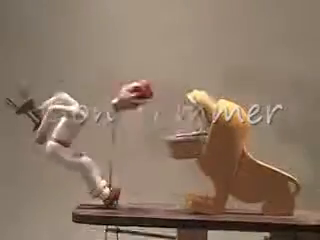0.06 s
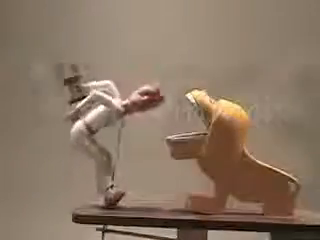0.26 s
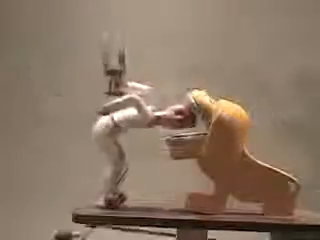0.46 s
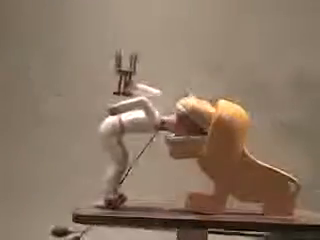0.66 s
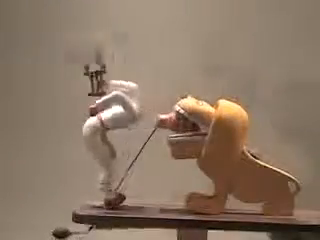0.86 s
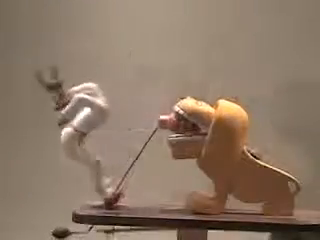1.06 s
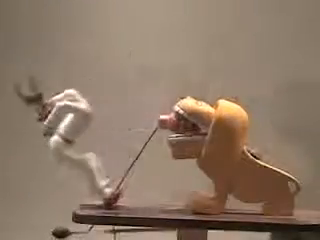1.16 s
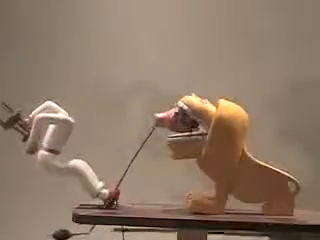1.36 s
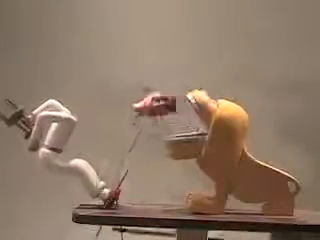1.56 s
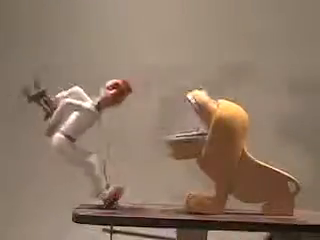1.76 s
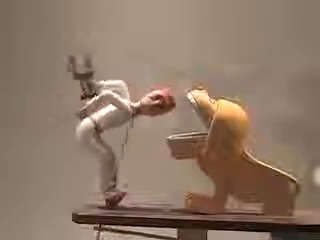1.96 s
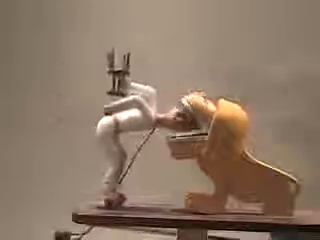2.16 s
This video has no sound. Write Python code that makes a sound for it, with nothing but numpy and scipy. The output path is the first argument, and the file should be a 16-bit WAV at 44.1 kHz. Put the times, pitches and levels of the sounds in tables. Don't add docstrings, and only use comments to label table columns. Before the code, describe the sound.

Hard wooden clacks from a mechanical toy in a small bare room, above a low motor drone.

```python
import sys
import numpy as np
from scipy import signal
from scipy.fft import rfft, irfft, next_fast_len
from scipy.io import wavfile
from scipy.ndimage import uniform_filter1d, map_coordinates

SR = 44100
rng = np.random.default_rng(int(sys.argv[2]) if len(sys.argv) > 2 else 0)


def ratio_of_db(decibels):
    return 10 ** (np.asarray(decibels, float) / 20)


def unload_audio(sound):
    columns = np.transpose(np.atleast_2d(sound))
    steps = np.round(np.clip(columns, -1, 1) * 32767)
    wavfile.write(sys.argv[1], SR, steps.astype(np.int16))


N = 97020


def unit(x):
    return x / np.sqrt(np.mean(x ** 2) + 1e-20)


def along(points, hz):
    f, v = np.transpose(points)
    return np.interp(np.log(hz + 1), np.log(f + 1), v)


def wobble(rate):
    knots = rng.standard_normal(int(N * rate / SR) + 4)
    return map_coordinates(knots, [np.arange(N) * rate / SR])


def filtered(x, response):
    m = next_fast_len(x.shape[-1] + SR // 2)
    return irfft(rfft(x, m) * response(np.fft.rfftfreq(m, 1 / SR)), m)[..., :x.shape[-1]]


CRACK, CRACK_T60_S, ATTACK_S = 0.2, 0.0081, 0.0001
BLOOM = 0.038
SCATTER_DB, GRAIN_RAD = 1.5, 0.07


def ring(modes, crack, attack_s=ATTACK_S):
    t = np.arange(SR // 3) / SR
    x = np.zeros(len(t))
    for k, (hz, db, t60) in enumerate(modes):
        decay = ratio_of_db(db + rng.normal(0, SCATTER_DB) - 60 * t / t60)
        bloom = 1 - np.exp(-t / (BLOOM * t60))
        grain = GRAIN_RAD * hz / 3000 * np.cumsum(rng.standard_normal(len(t)))
        x += (-1) ** k * decay * bloom * np.sin(2 * np.pi * hz * t + grain)
    x += crack * ratio_of_db(-60 * t / CRACK_T60_S) * rng.standard_normal(len(t))
    x *= 1 - np.exp(-t / attack_s)
    return x / np.abs(x).max()


NECK_WET_DB, JAW_WET_DB, LEVER_WET_DB, TICK_WET_DB = -4, -12, -12.5, -11
ROOM_DELAY_S, ROOM_RISE_S, ROOM_FEED_T60_S = 0.0087, 0.0059, 0.008
# frequency in Hz, t60 in seconds.
ROOM_DECAY = [(300, 0.83), (800, 0.32), (2100, 0.46), (5500, 0.45), (9000, 0.22)]
# frequency in Hz, level in dB.
ROOM_COLOUR = [(60, -29), (300, -1.5), (1000, 7), (2400, 6), (3300, -4), (4500, -1.5), (6500, -6),
               (9000, -5.5)]
# delay in seconds, level in dB.
WALLS = [(.0045, -10.5), (.0105, -6), (.021, -12.5), (.031, -11.5)]


def in_room(blow, wet_db):
    hz, t, z = signal.stft(rng.standard_normal((2, SR * 3 // 5)), SR, nperseg=256)
    tail_db = along(ROOM_COLOUR, hz)[:, None] - 60 * t / along(ROOM_DECAY, hz)[:, None]
    tail = signal.istft(z * ratio_of_db(tail_db), SR, nperseg=256)[1]
    since_arrival = np.maximum(np.arange(tail.shape[1]) / SR - ROOM_DELAY_S, 0)
    tail = tail * (1 - np.exp(-since_arrival / ROOM_RISE_S))
    feed = blow * ratio_of_db(-60 * np.arange(len(blow)) / SR / ROOM_FEED_T60_S)
    feed = feed * np.linalg.norm(blow) / np.linalg.norm(feed)
    wet = signal.fftconvolve(feed[None], ratio_of_db(wet_db) * tail / np.linalg.norm(tail[0]), axes=1)
    dry = np.pad(blow, (0, wet.shape[1] - len(blow)))
    walls = sum(ratio_of_db(db + wet_db - NECK_WET_DB) * np.roll(dry, round(s * SR)) for s, db in WALLS)
    return wet + (dry + walls) * [[1], [.5]]


REBOUND_S, REBOUND_DB = 0.0026, -3
# start in seconds, peak in dB.
CLACKS = [
    (0.2121, -5.5),
    (1.8425, -5.5),
]
# frequency in Hz, level in dB, t60 in seconds.
NECK = [(1040, -24.5, 0.037), (1615, -22, 0.014), (1870, -10.5, 0.027), (2255, -16, 0.011),
        (2477, -6, 0.022), (2775, -10.5, 0.015), (3265, -3.5, 0.011), (3696, -1.5, 0.0083),
        (3694, 0, 0.0088), (4422, -9.5, 0.019), (5020, -6.5, 0.0068), (5800, -14, 0.0057),
        (6600, -9, 0.0078), (8800, -39, 0.016)]


def head_clacks():
    blows = []
    for s, db in CLACKS:
        for k in range(2):
            sound = in_room(ring(NECK, CRACK), NECK_WET_DB)
            blows.append((s + k * REBOUND_S, db + k * REBOUND_DB, sound))
    return blows


# frequency in Hz, level in dB, t60 in seconds.
STAND = [(84, -37, 0.39), (103, -37.5, .2), (145.3, -32, 0.29), (383, -41.5, 0.077)]


def stand_thumps():
    loudest_db = max(db for hz, db, t60 in STAND)
    return [(s, db + loudest_db, ring(STAND, 0, attack_s=0.023) * [[1], [0]]) for s, db in CLACKS]


# start in seconds, peak in dB.
BITES = [
    (0.816, -19),
]
# frequency in Hz, level in dB, t60 in seconds.
JAW = [(1606, 1, 0.018), (1962, 1, .035), (2600, -2, .02), (3250, -0.5, 0.016), (3670, 6, 0.019),
       (4040, -6, 0.056), (4450, -2.5, 0.016), (4910, -2.5, 0.02), (6300, -17, .015), (8180, -28, .015)]


def jaw_bites():
    return [(s, db, in_room(ring(JAW, CRACK), JAW_WET_DB)) for s, db in BITES]


# start in seconds, peak in dB.
RELEASES = [
    (0.004, -28),
    (0.023, -26.5),
    (1.5543, -17),
    (1.5567, -16),
    (1.560, -16.5),
    (1.5629, -18.5),
    (1.651, -25.5),
    (1.658, -34.5),
]
# frequency in Hz, level in dB, t60 in seconds.
LEVER = [(540, -12, .02), (835, -10.5, 0.011), (1408, -2, 0.039), (1763, -1.5, 0.023), (2070, -5, .025),
         (2874, -6.5, 0.024), (3336, -3, 0.0099), (3897, -6.5, 0.017), (4990, -13, 0.0064),
         (6130, -12.5, .012), (6950, -12, 0.0095), (8480, -28, .008)]
DULL_DB_PER_OCTAVE = 0.5


def lever_blow(db):
    softer_db = max(level for s, level in RELEASES) - db
    modes = []
    for hz, level, t60 in LEVER:
        octaves_up = max(np.log2(hz / 1800), 0)
        modes.append((hz, level - DULL_DB_PER_OCTAVE * softer_db * octaves_up, t60))
    return ring(modes, CRACK * ratio_of_db(-2 * softer_db))


def lever_releases():
    return [(s, db, in_room(lever_blow(db), LEVER_WET_DB)) for s, db in RELEASES]


TICK_SPREAD = 0.05
# start in seconds, peak in dB, pitch in Hz, t60 in seconds.
TICKS = [
    (.5974, -39, 5140, 0.023),
    (.598, -43, 3320, 0.012),
    (0.9533, -36, 4950, 0.0185),
    (0.9544, -57, 7500, 0.012),
    (.960, -39, 2930, 0.032),
    (.687, -58, 7800, 0.021),
    (2.0306, -50, 7580, 0.018),
    (2.085, -55, 8660, 0.032),
]


def wire_ticks():
    blows = []
    for s, db, hz, t60 in TICKS:
        modes = [(hz, 0, t60), (hz + TICK_SPREAD * hz, -5, t60), (hz - TICK_SPREAD * hz, -5, t60)]
        blows.append((s, db, in_room(ring(modes, 0.1), TICK_WET_DB)))
    return blows


def toy():
    out = np.zeros((2, N + 2 * SR))
    for s, db, sound in head_clacks() + stand_thumps() + jaw_bites() + lever_releases() + wire_ticks():
        out[:, round(s * SR):][:, :sound.shape[1]] += ratio_of_db(db) * sound
    return out[:, :N]


# frequency in Hz, rms in dB, unsteadiness in dB, phase wander in radians.
HUM = [(54.6, -61, 2, .8), (59.1, -63, 2.5, .8), (109.1, -62, 1.5, .4), (120.03, -49, .3, .05),
       (138.2, -53, 1.5, .3), (209, -62, 1.5, .6), (218.2, -59, 1.5, .5), (240.06, -61, .5, .1),
       (360, -62, .5, .1), (472.2, -64, 1.5, .5), (1146, -61, 1, .8)]
HUM_DB = -0.2


def motor_hum():
    t = np.arange(N) / SR
    x = np.zeros(N)
    for hz, db, sway_db, wander in HUM:
        level = np.sqrt(2) * ratio_of_db(db + sway_db * wobble(5.5))
        x += level * np.sin(2 * np.pi * (hz * t + rng.random()) + wander * wobble(4.24))
    return ratio_of_db(HUM_DB) * x * np.array([[1], [0]])


AIR_PATCHY_DB = 1.5


def rush(spectrum):
    z = signal.stft(rng.standard_normal((2, N)), nperseg=512)[2]
    field = uniform_filter1d(rng.standard_normal(z.shape[1:]), 6, 0)
    field = uniform_filter1d(field, 10, 1)
    pair = signal.istft(z * ratio_of_db(AIR_PATCHY_DB * unit(field)), nperseg=512)[1][:, :N]
    return unit(filtered(pair, lambda hz: ratio_of_db(along(spectrum, hz))))


# frequency in Hz, density in dB per Hz.
AIR = [(200, -42), (330, -10.5), (1100, -8), (1650, -10), (2000, -16.5), (5500, -20.5), (6400, -31.5),
       (9300, -45)]
# frequency in Hz, density in dB per Hz.
RUMBLE = [(15, -45), (35, -29), (60, -23.5), (130, -5), (230, -8.5), (330, -12.5), (500, -61.5)]
AIR_DB, AIR_SWELL_DB, RUMBLE_DB = -43.5, 0.4, -54.5


def fan_air():
    return ratio_of_db(AIR_DB + AIR_SWELL_DB * wobble(3.5)) * rush(AIR) + ratio_of_db(RUMBLE_DB) * rush(RUMBLE)


DRUM_HZ, DRUM_DB = 149.8, -48.5


def camera_drum():
    phase = 2 * np.pi * DRUM_HZ * np.arange(N) / SR + 0.3 * wobble(1.8)
    return np.sqrt(2) * ratio_of_db(DRUM_DB + wobble(4)) * np.sin(phase)


# frequency in Hz, level in dB.
APART = [(60, -3), (300, -7), (1000, -14), (2500, -17), (5000, -17), (7000, -4), (9000, -2)]
# frequency in Hz, share of the middle taken from the left.
LEAN = [(6500, 0), (7400, .45), (9000, .4)]


def scene():
    mid, apart = toy() + motor_hum() + fan_air()
    side = filtered(apart, lambda hz: ratio_of_db(along(APART, hz))) - filtered(mid, lambda hz: along(LEAN, hz))
    side = side + camera_drum()
    return np.array([mid + side, mid - side])


def top_cut(x):
    return signal.sosfilt(signal.butter(12, 9420, fs=SR, output="sos"), x)


WIDEN_HZ, LEAK_HZ = 157.4, 15
NOTCH_HZ, NOTCH_DEPTH, NOTCH_FEEDBACK = 299.07, 0.99, 0.57
# frequency in Hz, level in dB.
MIC = [(6900, -1), (7500, -6.5), (8400, 2), (8950, -6), (9200, -26), (9450, -70.5), (9600, -90)]


def record(dry):
    wide = filtered(dry.mean(0), lambda hz: -1j * WIDEN_HZ * hz / (hz ** 2 + LEAK_HZ ** 2))

    def comb(hz):
        delay = np.exp(-2j * np.pi * hz / NOTCH_HZ)
        return (1 - NOTCH_DEPTH * delay) / (1 - NOTCH_FEEDBACK * delay)

    x = filtered(dry + wide * [[1], [-1]], lambda hz: comb(hz) * ratio_of_db(along(MIC, hz)))
    return top_cut(x)


dry = scene()
out = record(dry)
unload_audio(out)
```